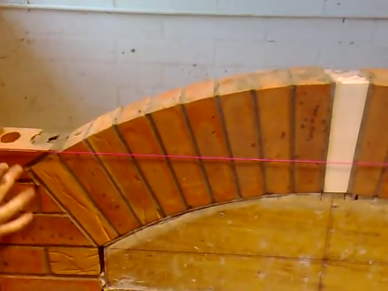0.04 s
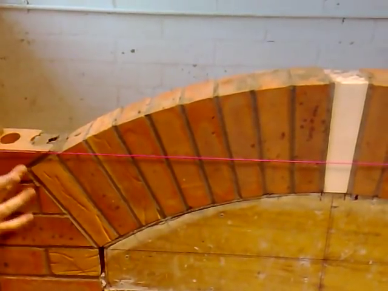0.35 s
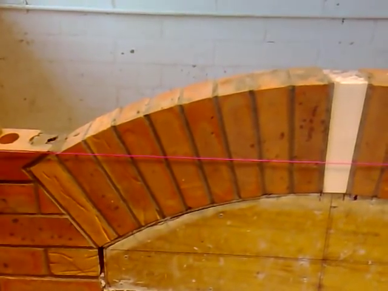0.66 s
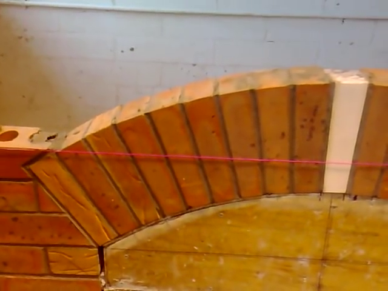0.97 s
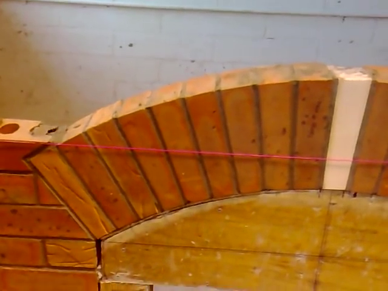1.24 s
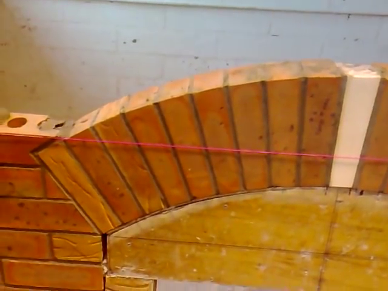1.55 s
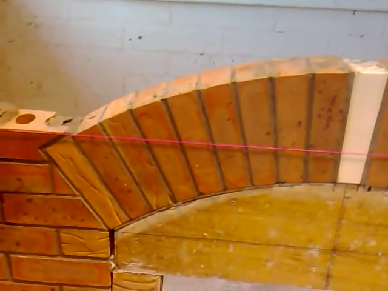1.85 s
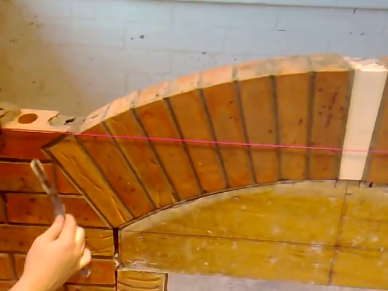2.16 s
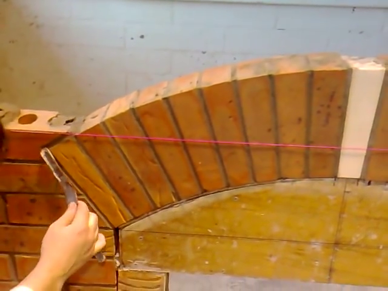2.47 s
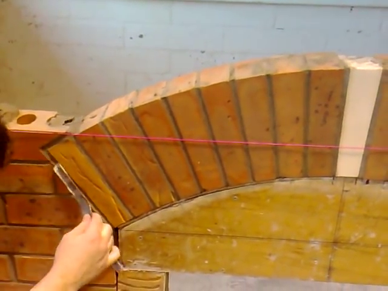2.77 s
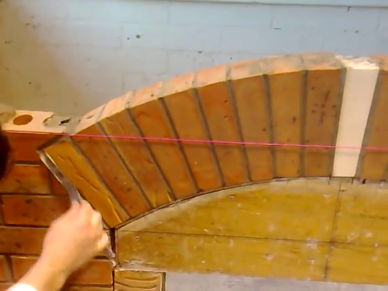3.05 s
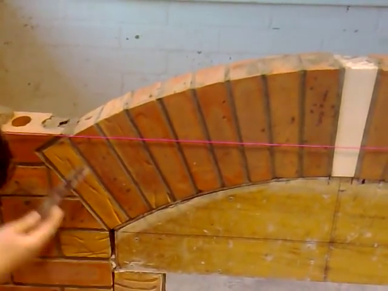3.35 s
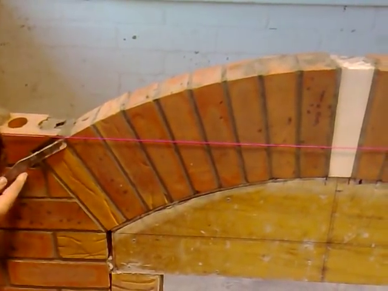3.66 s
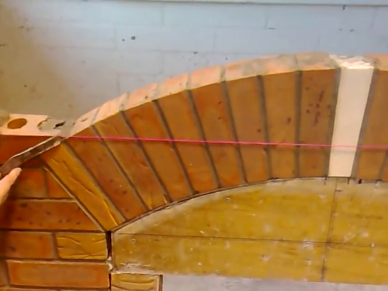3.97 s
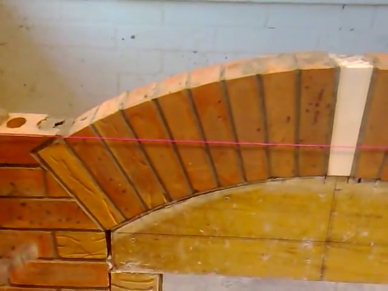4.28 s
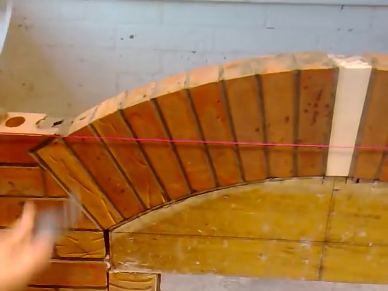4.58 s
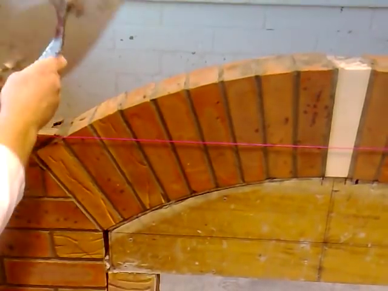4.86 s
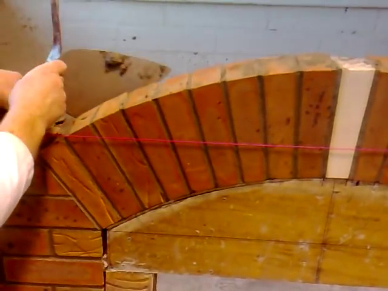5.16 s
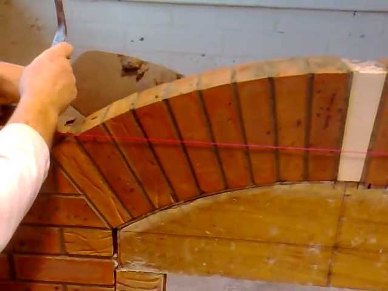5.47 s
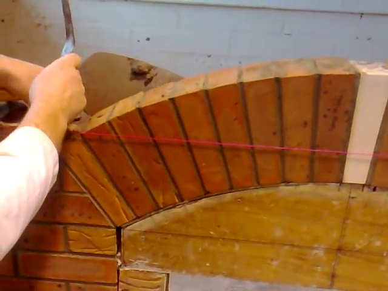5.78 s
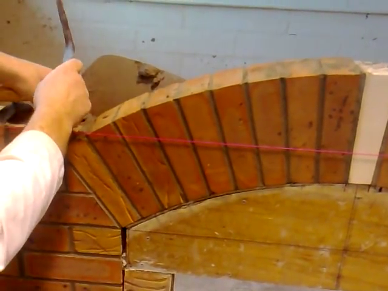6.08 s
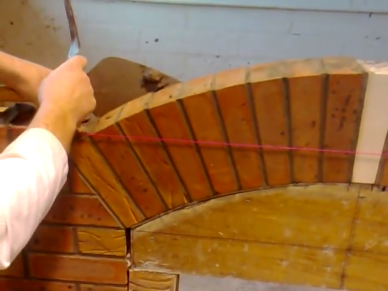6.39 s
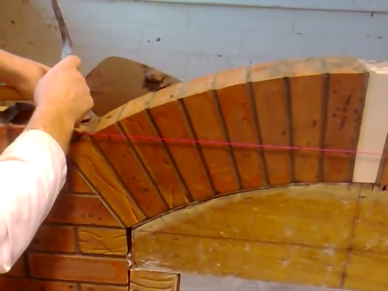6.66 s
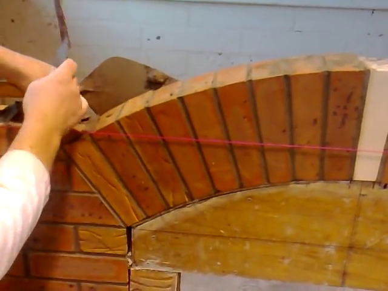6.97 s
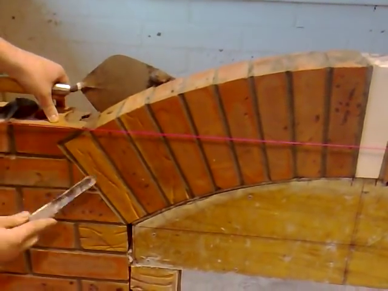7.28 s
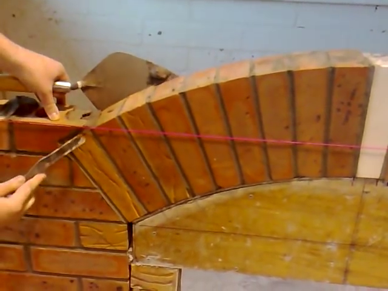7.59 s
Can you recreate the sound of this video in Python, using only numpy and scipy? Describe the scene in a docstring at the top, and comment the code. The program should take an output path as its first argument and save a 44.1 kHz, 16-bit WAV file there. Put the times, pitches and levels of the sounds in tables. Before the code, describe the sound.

Five hard taps of a steel trowel on brick, about three a second, end a short stretch of bricklaying heard from nearby. Before them come a faint dusty brushing, a brick grinding and knocking into place, and three gritty metallic scrapes along a joint. The taps ring slightly in the workshop, and a low fan hum continues underneath everything.

```python
"""Bricklaying in a workshop. Ventilation hums throughout: broadband air noise and two fan tones.
First fingers brush dry mortar, sleeves rustle, and a brick is shuffled and set down, thumping timber.
From about 3 s a steel tool scrapes three times over a joint, friction exciting its resonances.
A sleeve stirs; from 5.8 s five hard trowel taps seat a cut brick in the arch, each impact setting
steel, brick and wall into damped vibration. The brickwork and the room reflect the sound."""
import sys
import numpy as np
from scipy import signal
from scipy.fft import rfft, irfft
from scipy.io import wavfile

SR = 44100
rng = np.random.default_rng(int(sys.argv[2]) if len(sys.argv) > 2 else 0)


def inscribe(sig):
    """Save sig as 16-bit PCM at rate SR to the path in sys.argv[1].

    A 1-D sig is mono; a 2-D sig holds one channel per row.
    Samples are clipped to [-1, 1] before scaling.
    """
    pcm = np.round(np.clip(np.atleast_2d(sig).T, -1, 1) * 32767)
    wavfile.write(sys.argv[1], SR, pcm.astype(np.int16))


N = 345303
T = np.arange(N) / SR
FILTER_SIZE = 4096
HZ = np.fft.rfftfreq(FILTER_SIZE, 1 / SR)

# Levels in the tables are relative; each source sets its own gain.
# spectrum of the workshop's reverberation: frequency_hz, level_db
ROOM_SPECTRUM = [(150, -3), (600, -2.5), (1100, -1), (2000, 2.5), (3000, 1), (4300, -7.5), (6300, -5.5),
                 (9000, -6.5), (15000, 0.5)]
# its reverberation time: frequency_hz, t60_s
ROOM_DECAY = [(150, 0.83), (500, 1), (1100, 1.27), (2000, 1.12), (4300, 1.04), (6300, 0.77), (9000, .48),
              (15000, 0.29)]
# spectrum of the scatter from nearby brickwork: frequency_hz, level_db
SCATTER_SPECTRUM = [(150, -8), (500, 3), (1100, 0), (2000, 1.5), (3000, -3), (4200, -7), (6300, 3),
                    (9000, -0.5), (15000, 1.5)]
# its decay time: frequency_hz, t60_s
SCATTER_DECAY = [(150, 0.093), (1000, 0.17), (4000, 0.2), (9000, 0.14), (15000, 0.13)]
# reflections off the arch close behind the steel, direct sound first: delay_s, level_db
ARCH_PATHS = [(0, 0), (.00485, -1.5), (.0087, -13), (.0155, -19)]

# moving air: frequency_hz, level_db
AIR_SPECTRUM = [(12, -58), (20, -10), (64, -2), (168, -8.5), (242, -3.5), (271, -5), (340, -9.5),
                (371, -9.5), (617, -11.5), (1120, -24.5), (1220, -24), (2770, -36), (6680, -43),
                (16100, -45), (17500, -40.5)]
# rumbling resonances of the duct: centre_hz, half_width_hz, level_db
DUCT_MODES = [(54.2, 10, -55.5), (201.5, 12, -51)]
# steady fan tones: pitch_hz, level_db
FAN_TONES = [(245.7, -47.5), (346.1, -51)]

# fingers brushing dry mortar: start_s, rise_s, fall_s, pressure_db
FINGER_STROKES = [(.37, 0.048, .055, -57.5), (.595, 0.057, 0.048, -49.5)]
# brushed mortar dust: frequency_hz, level_db
DUST_SPECTRUM = [(800, -4), (2500, -6), (5000, -2), (8000, -6), (11000, -1), (17000, -5)]
# sleeve movements: start_s, rise_s, fall_s, pressure_db
SLEEVE_STROKES = [(.71, 0.067, 0.12, -50), (.85, .1, 0.11, -50), (4.91, 0.21, 0.34, -50)]
# rubbing cloth: frequency_hz, level_db
CLOTH_SPECTRUM = [(300, 8), (1200, 0.5), (2800, -8.5), (5000, -9.5), (8000, -23), (16000, -21)]

# shoves that shuffle a brick into place: start_s, rise_s, fall_s, pressure_db
BRICK_SHOVES = [(1.075, 0.024, .045, -35.5), (1.11, 0.065, 0.1, -38.5), (1.215, 0.042, 0.053, -34),
                (1.28, 0.066, 0.16, -48.5)]
# light knocks on brick: start_s, level_db, thump_db, tilt_db_per_octave
BRICK_BUMPS = [(1.0903, -6.5, 7, -6.5), (1.0998, -0.5, -3, -4.5), (1.2172, -2.5, -27, 0.5),
               (1.25, -14, -11, 3.5), (1.272, -7, -10, -1.5), (1.2767, 1, -5, -1.5),
               (1.7311, -12.5, -19, -7), (3.2415, -7.5, -6, 0.5), (5.2236, -19, -21.5, 3.5)]
# brick rubbed or knocked: frequency_hz, level_db
BRICK_SPECTRUM = [(80, -35.5), (200, 2), (450, -3), (800, 1), (1600, 1.5), (2400, -5), (3300, -14.5),
                  (4600, -12), (7000, -27.5), (16000, -32.5)]
# the timber under the arch: pitch_hz, level_db, t60_s
TIMBER_MODES = [(42, -25, 0.11), (74, -23, 0.13), (110, -14, 0.05), (174.5, -19.5, 0.041)]

# strokes of the tool over the joint: start_s, rise_s, fall_s, pressure_db, peakedness, grip
TOOL_STROKES = [(2.835, 0.07, 0.11, -33.5, 1.7, "along"), (3.195, 0.066, 0.1, -25, 1.4, "along"),
                (4.109, 0.11, 0.051, -22.5, 2.4, "across"), (4.232, .031, 0.041, -12.5, 2.7, "flick")]
# the tool's resonances, drawn along the joint, across it, or flicked off its end:
# centre_hz, half_width_hz, along_db, across_db, flick_db
TOOL_MODES = [(2153, 154, -5, -3.5, -4.5), (3477, 190, -10, -9, 6), (4870, 170, -1, 4.5, 14),
              (5500, 160, -5, -0.5, -9), (6425, 140, -2, -1, 5), (9210, 330, -8.5, -1, 3),
              (10370, 240, -12.5, -6.5, -16), (11020, 280, -11, -9, 0), (13470, 390, -9.5, -5.5, -2.5),
              (16600, 400, -35, -25, -10.5)]
# broad gritty noise beneath those resonances: frequency_hz, level_db
GRIT_SPECTRUM = [(100, -22.5), (600, -13.5), (1000, -14.5), (1700, -12.5), (2800, -25), (4200, -14),
                 (6200, -13.5), (7700, -24), (10000, -24), (12300, -35.5), (14500, -23), (17500, -36)]
# the tool singing on after a stroke: pitch_hz, level_db, t60_s
TOOL_RING_MODES = [(2272, -50, 0.11), (4860, -57, 0.45), (4870, -54, 0.23), (6363, -56, 0.12),
                   (9175, -62, .2)]
# the edge catching on grit or lightly touching brick; the row at 3.2051 s is the first catch # returning,
# louder, from the arch close behind: start_s, level_db
EDGE_CATCHES = [(3.2002, 0.5), (3.2051, 3.5), (3.2275, -3.5), (3.2455, -5), (3.2670, -2), (3.2780, -3.5),
                (3.49, -37.5), (3.7375, -28.5), (3.749, -42.5), (5.414, -37.5)]
# the push of a catching edge: frequency_hz, level_db
CATCH_SPECTRUM = [(500, -13.5), (2000, -6.5), (4500, -2), (6500, -1.5), (9000, -7), (14000, -18.5)]

# trowel taps: start_s, force_db, brick_db, crack_db, clang_pitch_ratio
TROWEL_TAPS = [(5.7552, -8.5, 7, 8, 0.975), (6.1247, -1.5, 2, 2.5, 0.98), (6.442, -3, 1.5, 3, 0.982),
               (6.7389, -2.5, -1.5, 5.5, 0.994), (6.9973, -6, 3.5, 5.5, 0.999)]
# the crack of first contact: frequency_hz, level_db
CRACK_SPECTRUM = [(200, -3.5), (600, -9), (1100, 3.5), (2400, -5.5), (3100, 3), (4200, 3.5), (6300, 3),
                  (7600, -7), (10500, -12.5), (14000, -14), (17500, -35)]
# grains crushed under the edge: frequency_hz, level_db
CRUSH_SPECTRUM = [(300, -30.5), (1300, -23.5), (2400, -15.5), (3000, -18.5), (5000, -10.5), (6400, -2.5),
                  (7700, -11.5), (9200, -10), (11200, -11.5), (13700, -16.5), (17500, -31.5)]
# the steel's brief clang: nominal_pitch_hz, level_db, t60_s
CLANG_MODES = [(3954, 5.5, 0.0067), (4172, 10.5, 0.0076), (4327, -4.5, 0.012), (4670, 5.5, 0.0098),
               (5980, -12.5, 0.013), (6450, -12, 0.01)]
# the blade's faint after-ring: pitch_hz, level_db, t60_s
BLADE_MODES = [(535, -47.5, 1), (1037, -39.5, 0.85), (1124, -40, .8), (1083, -30, 0.25), (1624, -55, 0.693),
               (1950, -40.5, 0.87), (2000, -45, 0.9), (3720, -52, .2), (4160, -43.5, 0.15),
               (4351, -39.5, 0.1495), (4580, -49.5, 0.55), (5604, -59.5, .6)]
# the brick's dull knock: pitch_hz, level_db, t60_s
BRICK_MODES = [(591, -17, 0.035), (686, -16, 0.021), (841, 0, 0.0072), (1013, 0, 0.0071), (1565, -14, 0.03),
               (1908, -9, 0.018), (2660, -27.5, 0.066)]
# the wall's thud: pitch_hz, level_db, t60_s
WALL_MODES = [(176, -22, 0.077), (187.3, -21, 0.11), (279, -4, 0.027), (386, -6.5, 0.025)]


def amp(db):
    """Amplitude grows tenfold for every 20 dB."""
    return 10 ** (np.asarray(db) / 20)


def unit_rms(x):
    """Normalisation to a mean power of 1."""
    return x / np.sqrt(np.mean(x ** 2) + 1e-20)


def wander(rate_hz):
    """Random modulation of rms 1, lying mostly below the given rate."""
    knots = T * 2 * rate_hz
    return unit_rms(np.interp(knots, np.arange(N), rng.standard_normal(N)))


def curve_at(points, hz):
    """Interpolation on a logarithmic frequency axis."""
    frequencies, values = np.transpose(points)
    return np.interp(np.log(hz + 1), np.log(frequencies), values)


def add(mix, start_s, sound):
    """Superposition: a sound adds to the mix from its start time."""
    part = mix[round(start_s * SR):][:len(sound)]
    part += sound[:len(part)]


def through(x, response):
    """A linear system convolves its input with its impulse response."""
    return signal.fftconvolve(x, response)[:N]


def click(spectrum_db):
    """Minimum phase packs a given spectrum into the promptest causal pulse, here of energy 1."""
    cepstrum = irfft(np.log(amp(spectrum_db)))
    cepstrum[1:FILTER_SIZE // 2] *= 2
    cepstrum[FILTER_SIZE // 2 + 1:] = 0
    pulse = irfft(np.exp(rfft(cepstrum)))
    return pulse / np.linalg.norm(pulse)


def burst(spectrum, decay_s):
    """Many tiny fractures merge into a short crunch of noise, of energy 1."""
    t = T[:SR // 40]
    fractures = rng.standard_normal(len(t)) * t * np.exp(-t / decay_s)
    crunch = signal.fftconvolve(fractures, click(curve_at(spectrum, HZ)))
    return crunch / np.linalg.norm(crunch)


def ring(modes, rise_s):
    """Damped modes build up over the time of contact, then decay exponentially."""
    t = T[:SR]
    sound = sum(amp(db - 60 * t / t60) * np.sin(2 * np.pi * hz * t) for hz, db, t60 in modes)
    return sound * (1 - np.exp(-(t / rise_s) ** 2))


def stroke(start_s, rise_s, fall_s, pressure_db, peakedness=1.56):
    """Contact pressure swells and eases in one arch; higher peakedness narrows it."""
    phase = np.interp(T - start_s, [0, rise_s, rise_s + fall_s], [0, 1, 0])
    return amp(pressure_db) * np.sin(np.pi / 2 * phase) ** peakedness


def friction(strokes, grains_per_s, spread_db, rub):
    """Sliding friction: random grain impulses over a smoother rub, both scaled by pressure."""
    sizes = amp(spread_db * np.minimum(rng.exponential(1, N), 4)) * rng.choice([-1, 1], N)
    grains = unit_rms(sizes * (rng.random(N) < grains_per_s / SR))
    rubbing = rub * rng.standard_normal(N)
    judder = amp(1.5 * wander(rate_hz=160))  # the surfaces grip and let go
    pressure = sum(stroke(*row) for row in strokes)
    return pressure * unit_rms((grains + rubbing) * judder)


def diffuse_field(x, spectrum, decay, build_s):
    """Dense reflections act as noise that builds up, then decays at its own rate in each band."""
    hz, t, bands = signal.stft(rng.standard_normal(SR * 3 // 2), SR, nperseg=256)
    bands *= amp(curve_at(spectrum, hz)[:, None] - 60 * t / curve_at(decay, hz)[:, None])
    tail = signal.istft(bands, SR, nperseg=256)[1]
    tail *= 1 - np.exp(-(T[:len(tail)] / build_s) ** 2)
    return through(x, tail / np.linalg.norm(tail))


def workshop(x, wet_db):
    """Reverberation: repeated reflection round the room leaves a long tail."""
    return amp(wet_db) * diffuse_field(x, ROOM_SPECTRUM, ROOM_DECAY, build_s=0.013)


def scatter(x, wet_db):
    """Scattering from the brickwork close by leaves a short tail."""
    return amp(wet_db) * diffuse_field(x, SCATTER_SPECTRUM, SCATTER_DECAY, build_s=0.016)


def resonance(hz, centre_hz, half_width_hz):
    """A resonance peak of Lorentzian shape, 1 at its centre."""
    return 1 / (1 + ((hz - centre_hz) / half_width_hz) ** 2)


def coloured_noise(gain):
    """Filtered white noise takes the spectrum of its filter; rms 1."""
    return unit_rms(irfft(rfft(rng.standard_normal(N)) * gain, N))


def ventilation():
    """Flow noise and duct resonances lie under two slightly wavering fan tones."""
    hz = np.fft.rfftfreq(N, 1 / SR)
    out = amp(-42) * coloured_noise(amp(curve_at(AIR_SPECTRUM, hz)))
    for centre_hz, half_width_hz, level_db in DUCT_MODES:
        out += amp(level_db) * coloured_noise(resonance(hz, centre_hz, half_width_hz))
    for pitch_hz, level_db in FAN_TONES:
        cycles = np.cumsum(pitch_hz + 0.4 * wander(rate_hz=3.1)) / SR
        out += amp(level_db + 0.1 * wander(rate_hz=3.1)) * unit_rms(np.sin(2 * np.pi * cycles))
    return out


def fingers():
    """Light friction on dry mortar gives a dusty hiss."""
    brushing = friction(FINGER_STROKES, grains_per_s=2500, spread_db=4, rub=0.8)
    return through(brushing, click(curve_at(DUST_SPECTRUM, HZ)))


def sleeves():
    """Friction of cloth gives a dull rustle."""
    rustling = friction(SLEEVE_STROKES, grains_per_s=1000, spread_db=3, rub=0.61)
    return through(rustling, click(curve_at(CLOTH_SPECTRUM, HZ)))


def brick_shuffle():
    """Friction and impact: a brick grinds and rocks on its bed, exciting the timber's modes."""
    grinding = friction(BRICK_SHOVES, grains_per_s=2500, spread_db=2, rub=0.7)
    out = through(grinding, click(curve_at(BRICK_SPECTRUM, HZ)))
    thump = amp(-6.5) * ring(TIMBER_MODES, rise_s=0.0037)
    for start_s, level_db, thump_db, tilt in BRICK_BUMPS:
        spectrum = [(hz, db + tilt * np.log2(hz / 1000)) for hz, db in BRICK_SPECTRUM]
        add(out, start_s, amp(level_db) * burst(spectrum, decay_s=0.0018))
        add(out, start_s, amp(level_db + thump_db) * thump)
    return out


def tool_response(grip):
    """Steel resonances add in power to broad grit noise; the grip decides which stand out."""
    power = amp(curve_at(GRIT_SPECTRUM, HZ)) ** 2
    for centre_hz, half_width_hz, along_db, across_db, flick_db in TOOL_MODES:
        level_db = {"along": along_db, "across": across_db, "flick": flick_db}[grip]
        power += (amp(level_db) * resonance(HZ, centre_hz, half_width_hz)) ** 2
    return click(10 * np.log10(power))


def tool_strokes(grip):
    """The strokes that share one grip, and so one response."""
    return [row[:-1] for row in TOOL_STROKES if row[-1] == grip]


def joint_scrapes():
    """Forced vibration: grit drives the steel tool, which rings on freely after each stroke."""
    along = friction(tool_strokes("along"), grains_per_s=5000, spread_db=0, rub=0.1)
    across = friction(tool_strokes("across"), grains_per_s=4100, spread_db=1.5, rub=0.7)
    flick = friction(tool_strokes("flick"), grains_per_s=5000, spread_db=1.6, rub=0.28)
    catches = np.zeros(N)
    for start_s, level_db in EDGE_CATCHES:
        add(catches, start_s, amp(level_db) * burst(CATCH_SPECTRUM, decay_s=0.0014))
    rasp = through(along + catches, tool_response("along"))
    rasp += through(across, tool_response("across"))
    rasp += through(flick, tool_response("flick"))
    drive = along + across + flick + amp(8) * catches
    return rasp + amp(-2) * through(drive, ring(TOOL_RING_MODES, rise_s=0.001))


def trowel_taps():
    """Impact excites the modes of steel and brick; the heavy wall answers a moment later."""
    out, radiated = np.zeros((2, N))
    knock = ring(BRICK_MODES, rise_s=0.00094)
    blade = ring(BLADE_MODES, rise_s=0.0012)
    thud = ring(WALL_MODES, rise_s=0.0028)
    for start_s, force_db, brick_db, crack_db, pitch_ratio in TROWEL_TAPS:
        clang = ring([(hz * pitch_ratio, db, t60) for hz, db, t60 in CLANG_MODES], rise_s=0.00093)
        hit = amp(3) * clang + amp(brick_db) * knock
        add(hit, 0.0003, amp(8 + crack_db) * click(curve_at(CRACK_SPECTRUM, HZ)))
        add(hit, 0, amp(3) * burst(CRUSH_SPECTRUM, decay_s=0.0016))
        body = blade.copy()
        add(body, 0.00634, amp(brick_db) * thud)
        force = amp(force_db)
        for delay_s, path_db in ARCH_PATHS:
            add(out, start_s + delay_s, force * amp(path_db) * hit)
        add(out, start_s, force * body)
        blow = force * (hit + body)
        add(radiated, start_s, blow)
        add(out, start_s, workshop(blow, wet_db=-11.5))  # each blow stirs the room afresh
    out += scatter(radiated, wet_db=-6)
    # a steep high-pass at 130 Hz keeps deep bass out of the taps
    return signal.sosfilt(signal.butter(6, 130, "highpass", fs=SR, output="sos"), out)


def scene():
    """The work, its reflections and the hum superpose in one channel."""
    steel, brick = joint_scrapes(), brick_shuffle()
    steel = steel + scatter(steel, wet_db=-17.5) + workshop(steel, wet_db=-16.5)
    brick = brick + scatter(brick, wet_db=-11.5) + workshop(brick, wet_db=-22.5)
    return (trowel_taps() + steel + brick + fingers() + sleeves() + ventilation())[None]


def record(dry):
    """Saturation: the hardest taps overload the microphone softly; a low-pass then limits the band."""
    saturated = dry / (1 + dry ** 6) ** (1 / 6)
    lowpass = signal.firwin(255, 17400, window=("kaiser", 9), fs=SR)
    return signal.oaconvolve(saturated, lowpass[None], "same")


dry = scene()
out = record(dry)
inscribe(out)
```